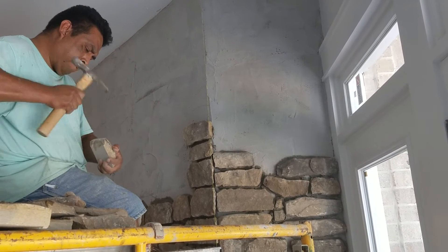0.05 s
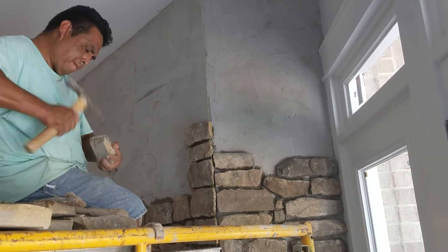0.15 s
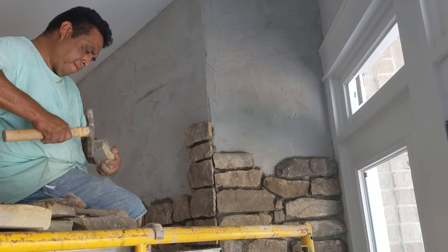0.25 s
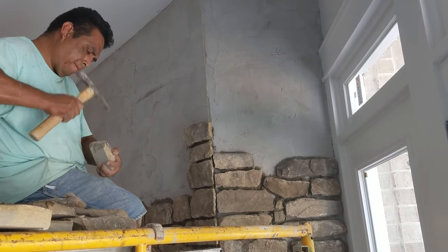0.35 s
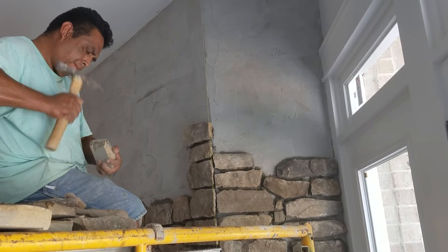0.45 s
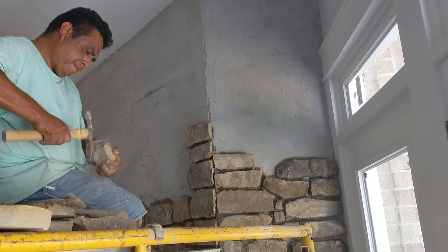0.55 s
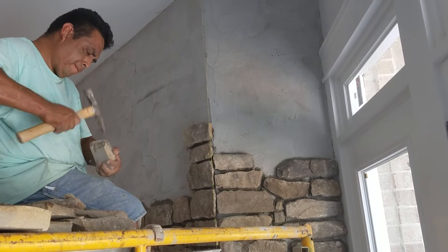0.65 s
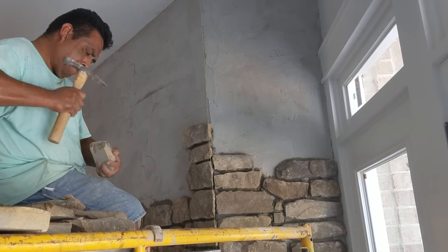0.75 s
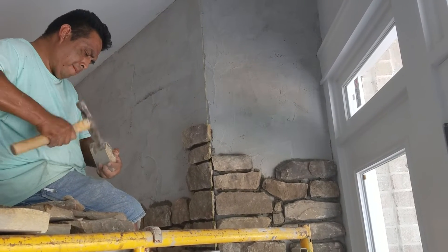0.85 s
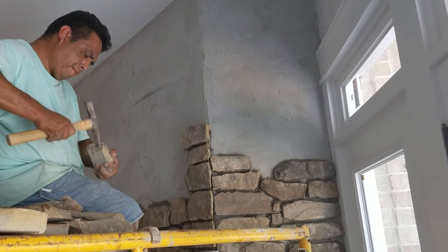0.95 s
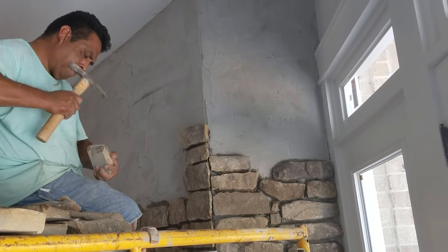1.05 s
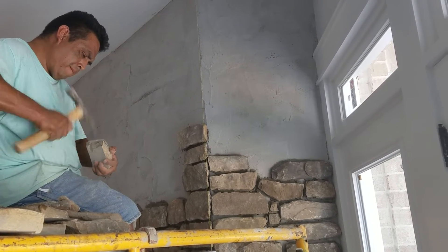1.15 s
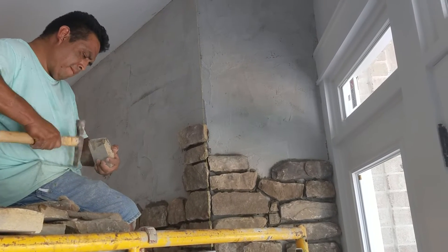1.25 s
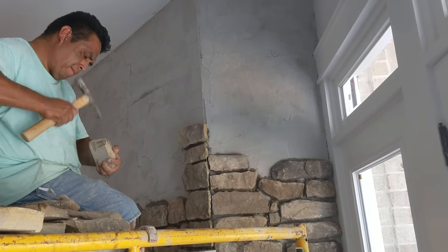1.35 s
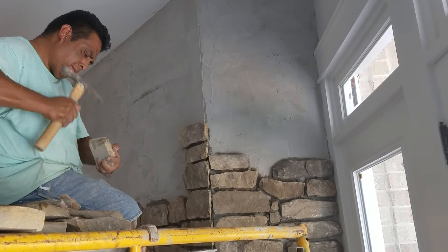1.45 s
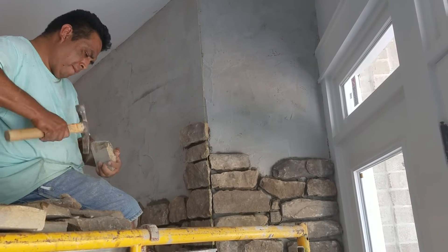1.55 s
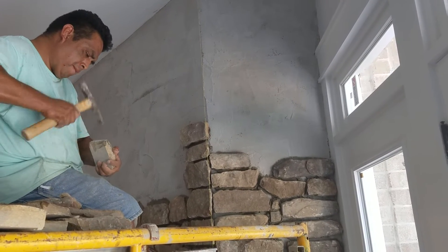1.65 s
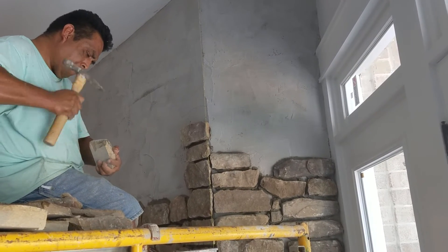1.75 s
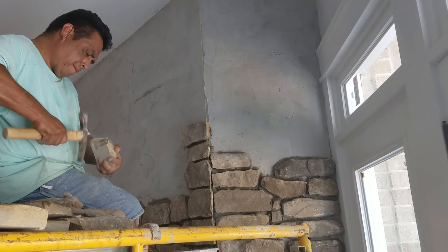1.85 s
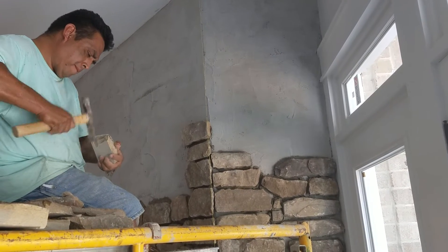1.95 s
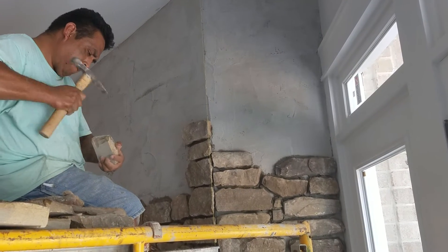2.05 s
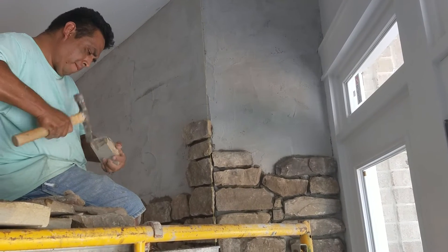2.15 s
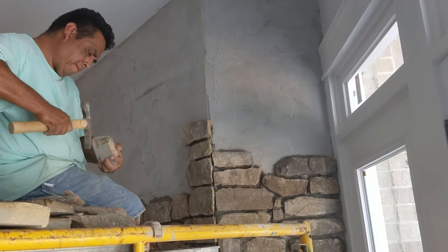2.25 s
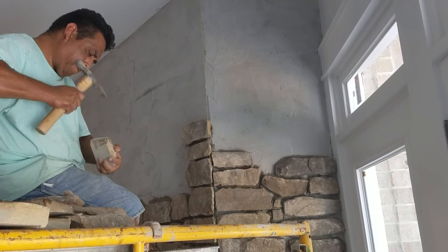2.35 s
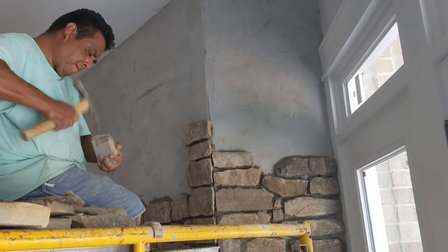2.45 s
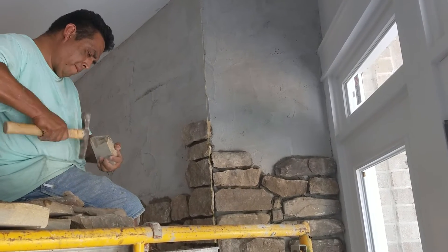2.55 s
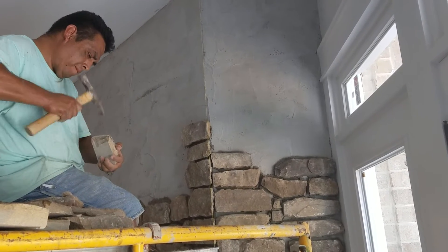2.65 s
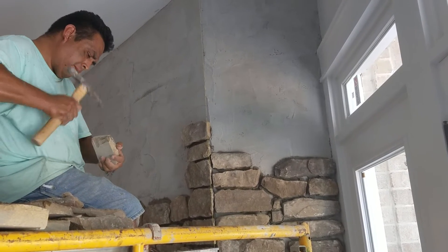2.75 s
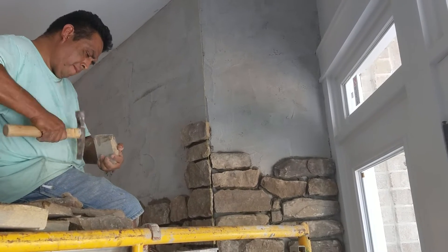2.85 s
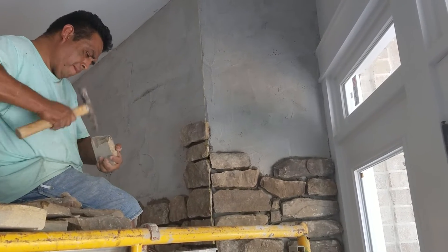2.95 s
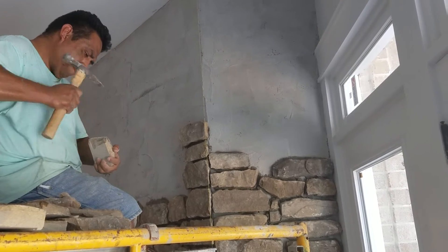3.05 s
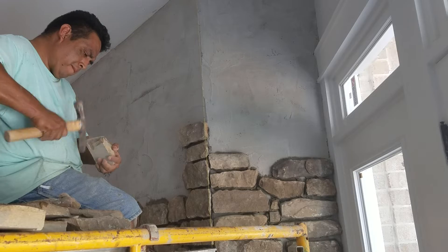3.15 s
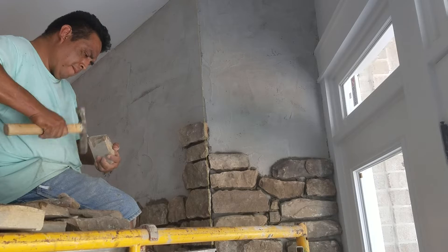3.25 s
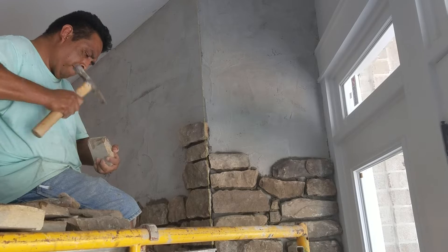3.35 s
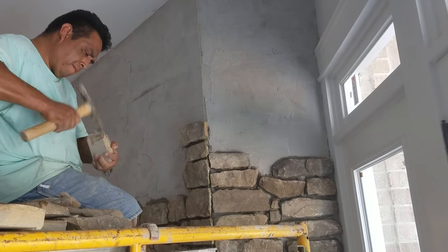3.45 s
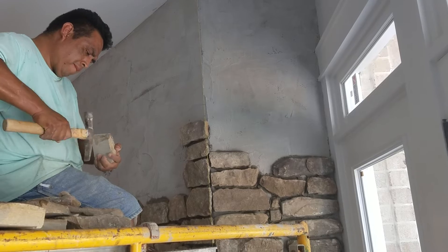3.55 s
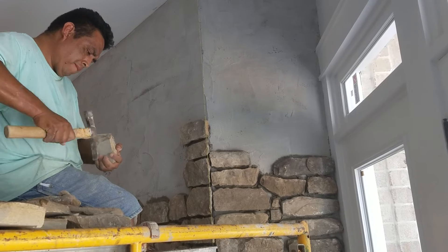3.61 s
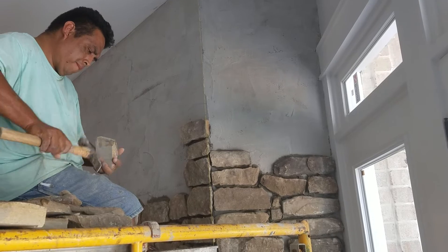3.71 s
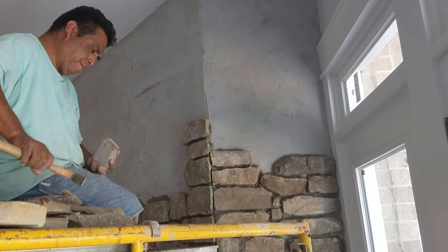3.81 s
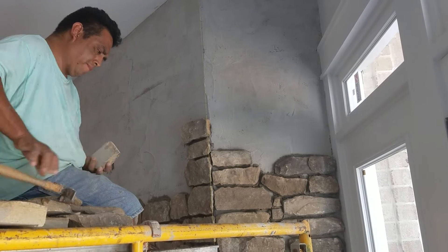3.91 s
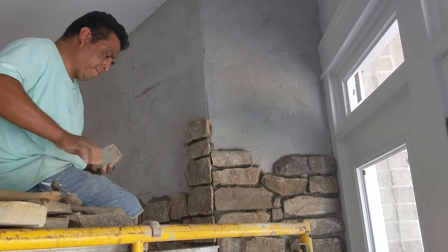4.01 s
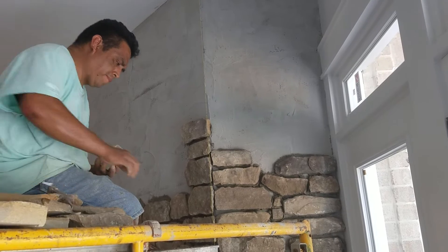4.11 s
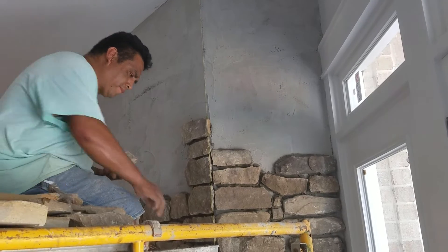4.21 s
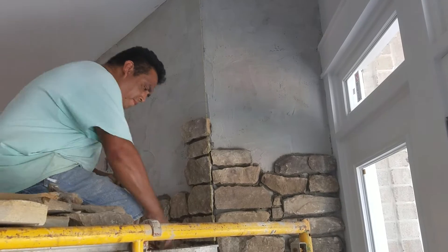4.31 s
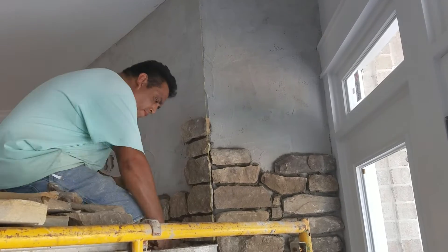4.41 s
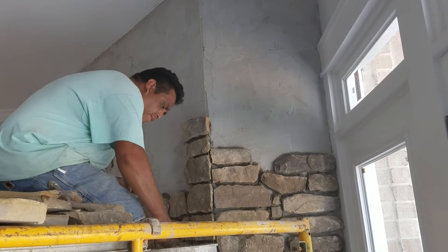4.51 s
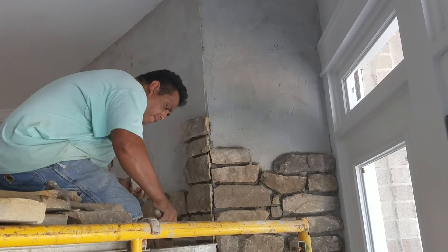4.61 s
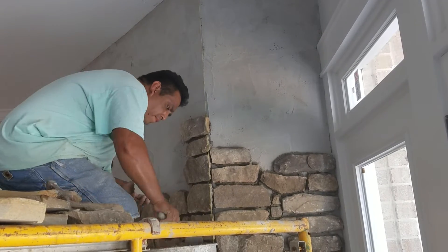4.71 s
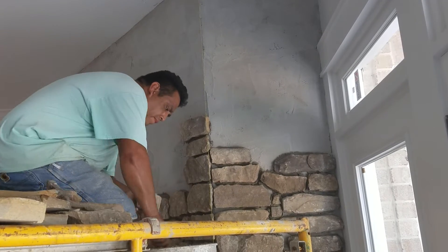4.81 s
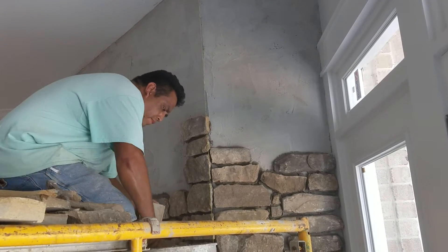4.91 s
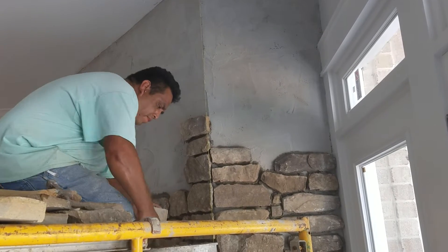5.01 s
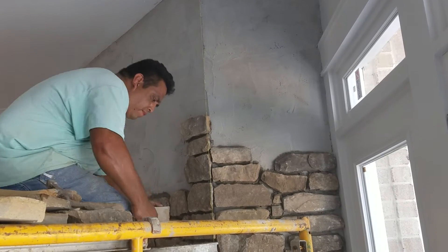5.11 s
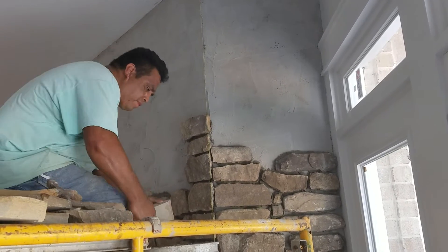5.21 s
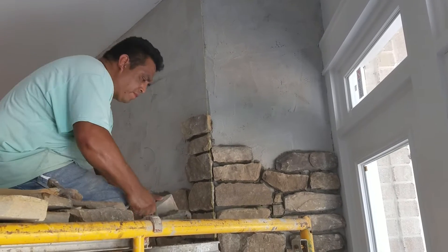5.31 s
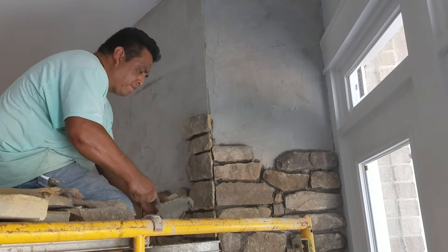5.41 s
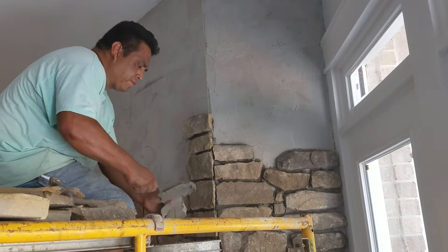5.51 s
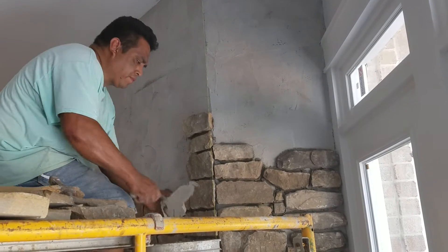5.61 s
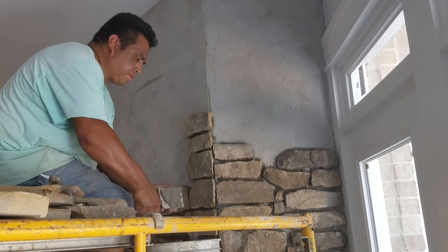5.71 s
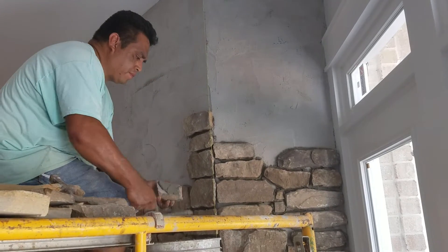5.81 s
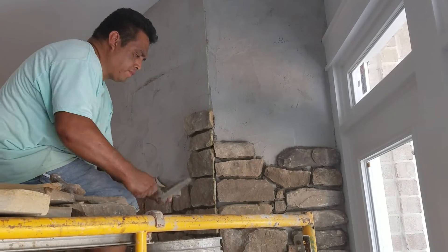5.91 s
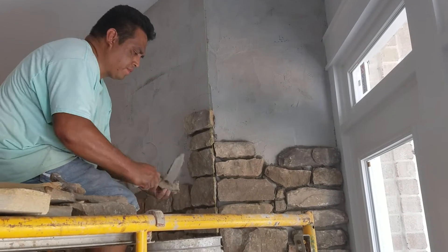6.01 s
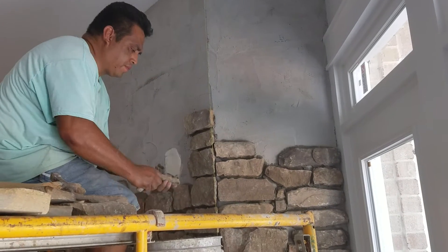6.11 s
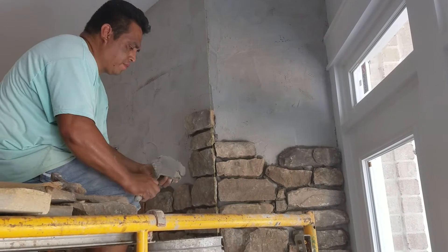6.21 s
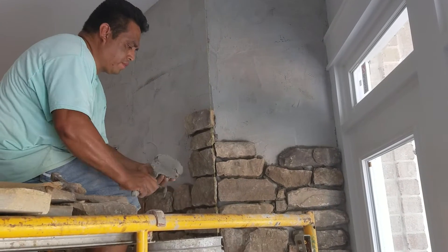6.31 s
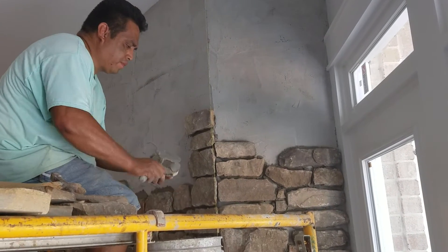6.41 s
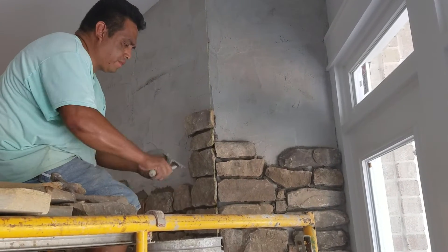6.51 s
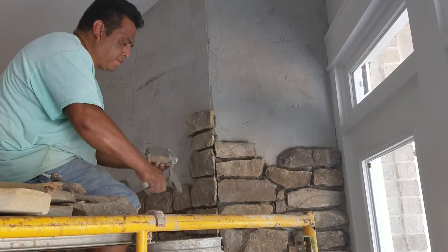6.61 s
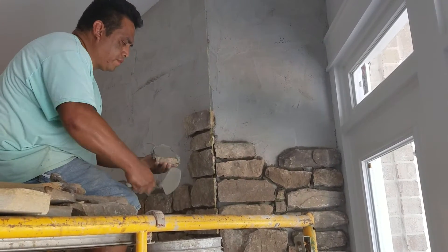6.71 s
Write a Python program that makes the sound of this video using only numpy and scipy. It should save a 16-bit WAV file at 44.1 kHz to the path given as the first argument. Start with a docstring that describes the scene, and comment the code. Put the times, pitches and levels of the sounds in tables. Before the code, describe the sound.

In an echoing porch, about a dozen evenly paced hammer blows crack against stone, the steel head ringing brightly as chips fall. The run ends in a tumble of thuds on planks. Quieter work follows: low bumps, short sandy trowel scrapes, dull knocks on a mortar tub and scattered metallic clicks. The sound is in stereo, with faint outdoor air and a distant machine humming underneath.

```python
"""In a bare plastered porch, a mason trims a hand-held stone with a steel hammer, three blows a second.
Each blow cracks the stone and rings the hammer head; broken pieces drop and thud on boards below.
He lays the hammer down, shifts on the scaffold, scrapes mortar from a tub and taps the trowel.
The walls echo all of it, over soft outdoor air and the faint hum of a distant machine."""
import sys
import numpy as np
from scipy import signal
from scipy.fft import rfft, irfft, next_fast_len
from scipy.io import wavfile
from scipy.ndimage import uniform_filter1d

SR = 44100
rng = np.random.default_rng(int(sys.argv[2]) if len(sys.argv) > 2 else 0)


def wrap_up_sound(samples):
    """Save the sound to the file named by the first command line argument, as 16-bit audio."""
    columns = np.atleast_2d(samples).T
    # keep every value between -1 and 1, then stretch to whole-number steps
    tamed = np.clip(columns, -1, 1)
    steps = np.round(tamed * 32767).astype(np.int16)
    wavfile.write(sys.argv[1], SR, steps)


N = 298116
TIME = np.arange(N) / SR  # seconds through the scene
AGE = np.arange(48000) / SR  # seconds since one short sound began

# Hammer blows; the last is just a touch as it is laid down. Each row: start in seconds, crack level
# in dB, tilt in dB per octave (higher is brighter), then a level in dB for each main head tone.
BLOWS = [(-.15, -25, 1, -28, -37, -29), (.182, -19, 0.17, -45, -38, -30.5),
         (0.5097, -19, -0.2, -35, -29, -37), (.847, -21.5, 0.92, -40, -21, -28),
         (1.1769, -23, 0.99, -29.5, -26.5, -27), (1.505, -21, 0.66, -28, -16, -32),
         (1.8232, -22, 1, -27.5, -20.5, -36), (2.148, -22.5, 0.67, -32.5, -18.5, -33),
         (2.4778, -25, 0.39, -65, -29.5, -27), (2.8012, -26, -2, -43, -22.5, -33.5),
         (3.142, -22, -1.1, -48, -24, -31.5), (3.471, -17.5, 0.72, -36, -34, -27.5),
         (4.105, -45.5, 1, -45, -39, -66)]
# The head's main tones. Each row: pitch in Hz, fade time in seconds (the time to drop by 60 dB).
HEAD_TONES = [(2520, .3), (3987, .18), (13125, .05)]
# Its weaker tones. Each row: pitch in Hz, level in dB, fade time in seconds.
WEAK_TONES = [(2062, -6, .06), (2366, -5, .08), (4650, -1, .04), (5850, 0, .04), (10400, -5, .02),
              (14420, -12, .02)]
# The colour of cracking stone. Each row: frequency in Hz, level in dB.
CRACK_COLOUR = [(20, -41), (200, -13), (350, -10), (600, 0.5), (1000, 0), (1500, 4), (2200, 4), (3100, 1.5),
                (4300, 3.5), (5100, -7.5), (6600, -7), (8000, -16.5), (14000, -11.5), (16000, -41.5)]


def hammer(weak_db=-13, sharpness=3, tick_db=-11.5, tick_from_hz=6600):
    """Steel ticks on the stone and crushes its edge; the spot that is hit decides which tones ring."""
    out = np.zeros((2, N))
    for start, db, tilt_db, *tone_levels in BLOWS:
        room = porch(direct_db=-9, early_db=-3, early_s=.011)
        crack = colour(crunch(fade_s=.00064), CRACK_COLOUR, tilt_db)
        add(out, start, db, echo(crack, room))
        tick = cut_bass(crunch(fade_s=.002), tick_from_hz)
        add(out, start, db + tick_db, echo(tick, porch(direct_db=8, early_db=8, early_s=.004)))
        # a sharper contact brings out the weaker tones
        add(out, start, db + weak_db + sharpness * tilt_db, echo(ring(WEAK_TONES, detune=.002), room))
        for (hz, fade_s), tone_db in zip(HEAD_TONES, tone_levels):
            # the head turns and travels as it bounces back, so its ring flutters
            flutter = undb(2.2 * wander(count=140, length=len(AGE)))
            head = ring([(hz, 0, fade_s)], detune=.0003) * flutter
            add(out, start, tone_db, echo(head, porch(direct_db=0, early_db=-1)))
    return out


# Stone pieces and the hammer landing on the boards. Each row: start in seconds, level in dB,
# bass cutoff in Hz, tumbling time in seconds, the piece's own ring in dB compared with the boards.
LANDINGS = [(.124, -33.5, 110, 0.0014, 3.5), (.657, -17.5, 770, 0.0034, -14),
            (2.62, -36.5, 1020, 0.00064, -15), (3.892, -17, 30.2, 0.0035, -12.5),
            (3.92, -21.5, 400, 0.0065, -12), (4.004, -25.5, 704, 0.0012, -7), (4.009, -16, 40, 0.0047, -37),
            (4.053, -19.5, 40, 0.0033, -23), (4.089, -25, 334, 0.0097, -19), (4.204, -28, 100, 0.0014, -30)]
# The colour of a thud on the boards. Each row: frequency in Hz, level in dB.
BOARD_COLOUR = [(18, -78), (40, -10.5), (110, -17), (200, -15), (290, 0), (430, -6), (520, -7.5), (740, -8),
                (950, -14), (2150, -14.5), (3100, -29), (4600, -38.5), (9000, -50), (16000, -51)]
# How the boards, a loose piece and a chip ring. Each row: pitch in Hz, level in dB, fade in seconds.
BOARD_TONES = [(167, -4.5, .15), (310, -9, 0.09), (387, 6.5, 0.075), (465, -2, 0.092), (475, -13, 0.36),
               (639, -9, 0.39), (746, -5.5, 0.12)]
PIECE_TONES = [(1903, 5.5, 0.2), (2060, 3, 0.43)]
CHIP_TONES = [(1970, -9.5, 0.016), (2560, -1, 0.0034), (3240, -5.5, 0.0026)]
# Small chips landing. Each row: start in seconds, level in dB.
CHIPS = [(0.1186, -28.5), (0.629, -25)]


def falling_pieces(board_ring_db=-8):
    """Big pieces tumble on the boards, and both ring; small chips only tick."""
    out = np.zeros((2, N))
    for start, db, cutoff_hz, tumble_s, piece_db in LANDINGS:
        thud = unit(colour(crunch(tumble_s, rise=.98), BOARD_COLOUR))
        board_ring = undb(board_ring_db) * unit(ring(BOARD_TONES, detune=.0054))
        boards = unit(cut_bass(thud + board_ring, cutoff_hz))
        piece = undb(piece_db) * unit(ring(PIECE_TONES, detune=.006))
        add(out, start, db, echo(boards + piece, porch(direct_db=-1, early_db=-2, early_s=.024)))
    for start, db in CHIPS:
        add(out, start, db, echo(ring(CHIP_TONES, detune=.02), porch(direct_db=5, early_db=-3)))
    return out


# Steel clicking on stone. Each row: start in seconds, level in dB, tilt in dB per octave,
# contact time in seconds.
TAPS = [(3.8864, -27, -2, 0.0065), (4.146, -49, 2, 0.0026), (4.583, -43.5, 2.5, 0.0019),
        (4.913, -39, 4, 0.011), (4.962, -34, 2, .006), (5.358, -37.5, 2.5, 0.0081),
        (5.5033, -24.5, 4, 0.0058), (5.513, -35, 2.5, 0.0053), (6.137, -43, 1.5, 0.014),
        (6.307, -36.5, 3, 0.0047), (6.531, -30.5, 4, 0.0026), (6.553, -31.5, 4.5, .002),
        (6.565, -41, 1.5, .003)]
# The colour of that click. Each row: frequency in Hz, level in dB.
STEEL_COLOUR = [(20, -45), (150, -49), (400, 6.5), (900, 10.5), (2000, 7.5), (3200, 2), (6000, -5.5),
                (9500, -9.5), (12000, -2.5), (14500, -4), (16000, -1)]
# The blade knocking the mortar tub. Each row: start in seconds, level in dB.
KNOCKS = [(4.962, -33.5), (5.011, -29), (5.358, -42.5), (5.505, -36)]
# The tub's tones. Each row: pitch in Hz, level in dB, fade time in seconds.
TUB_TONES = [(280, -0.5, 0.1), (370, 5.5, 0.19), (406.7, 7.5, 0.13), (455, 2, 0.12), (517, 0.5, 0.35),
             (632, -3.5, 0.077), (766, -3, 0.047), (1110, 1, 0.057)]


def trowel_taps(contact_db=-4.5, right_louder_db=.5):
    """The blade clicks on stone, and its dull knocks set the tub ringing."""
    out = np.zeros((2, N))
    pan = undb(np.array([[-right_louder_db], [right_louder_db]]) / 2)
    for start, db, tilt_db, contact_s in TAPS:
        room = pan * porch(direct_db=2, early_db=3, early_s=.005)
        click = colour(crunch(contact_s), STEEL_COLOUR, tilt_db)
        add(out, start, db, echo(click, room))
    for start, db in KNOCKS:
        room = pan * porch(direct_db=-1, early_db=4.5, early_s=.029)
        contact = unit(colour(crunch(fade_s=.0033), STEEL_COLOUR, tilt_db=-13))
        tub = unit(ring(TUB_TONES, detune=.0286))
        add(out, start, db, echo(tub + undb(contact_db) * contact, room))
    return out


# Trowel strokes through mortar. Each row: start in seconds, seconds to reach full force,
# seconds held, level in dB, treble change from dry grit in dB.
STROKES = [(4.814, 0.0092, 0.16, -44, 0), (4.936, 0.023, 0.085, -28, 0), (5.364, 0.11, 0.019, -28.5, 6.5),
           (6.133, 0.0062, 0.054, -40, -10), (6.21, 0.049, 0.025, -36, 1)]
# The colour of scraped sand. Each row: frequency in Hz, level in dB.
SAND_COLOUR = [(20, -45), (180, -4.5), (400, -1), (700, 8), (1050, 4.5), (1500, 0), (1780, 8.5), (1930, 4),
               (2090, 8), (2300, 1.5), (2520, 5), (3100, -4.5), (3960, 0), (5000, -6.5), (9500, -10),
               (12000, -3), (15500, -8)]


def trowel_scrapes(judder_db=3, grit_hz=3000):
    """Sand grains of many sizes catch under the blade as it drags."""
    sizes_db = 4.5 * rng.standard_normal(N)
    grains = rng.standard_normal(N) * undb(sizes_db + judder_db * wander(count=1000, length=N))
    sand = np.sqrt(N) * unit(colour(grains, SAND_COLOUR))
    body = signal.sosfiltfilt(signal.butter(2, grit_hz, fs=SR, output="sos"), sand)
    grit = sand - body
    drag = sum(undb(db) * stroke_force(TIME - start, rise_s, hold_s) * (body + undb(grit_db) * grit)
               for start, rise_s, hold_s, db, grit_db in STROKES)
    room = unit(porch(direct_db=2, early_db=3.5))
    return signal.fftconvolve(drag[None], room, axes=-1)[:, :N]


def stroke_force(age, rise_s, hold_s, bite_db=-14.5, ease_db_per_s=52, lift_db_per_s=418):
    """The blade bites gently, swells to full force, eases while held and fades as it lifts."""
    swell_db = bite_db * np.clip(1 - age / rise_s, 0, 1)
    ease_db = ease_db_per_s * np.clip(age - rise_s, 0, hold_s)
    lift_db = lift_db_per_s * np.maximum(age - rise_s - hold_s, 0)
    return (age >= 0) * undb(swell_db - ease_db - lift_db)


# Bumps of the scaffold. Each row: start in seconds, level in dB.
BUMPS = [(4.46, -36), (4.529, -43), (4.66, -40), (4.914, -39.5)]
# Their deep colour. Each row: frequency in Hz, level in dB.
BUMP_COLOUR = [(25, -12), (60, -7), (130, 0), (240, -6.5), (450, -11), (1000, -16.5), (4000, -29.5),
               (15000, -46.5)]


def scaffold():
    """The planks bump as the mason leans forward."""
    out = np.zeros((2, N))
    for start, db in BUMPS:
        bump = colour(crunch(fade_s=.029), BUMP_COLOUR)
        add(out, start, db, echo(bump, porch(direct_db=-4, early_db=-10)))
    return out


# How long the walls echo. Each row: frequency in Hz, fade time in seconds.
WALL_ECHO = [(100, 0.94), (400, 1), (1500, 1), (4000, 0.75), (8000, 0.81), (14000, 0.42)]


def porch(direct_db, early_db, early_s=.012, build_s=.0047, alike_hz=620):
    """One click in the porch: the direct sound, early bounces off close walls, then a tail at 0 dB."""
    hz = np.fft.rfftfreq(512, 1 / SR)
    seconds = np.arange(190) * 256 / SR
    noise = rng.standard_normal((2, len(hz), len(seconds), 2)) @ np.array([1, 1j])
    fading = undb(-60 * seconds / read(WALL_ECHO, hz)[:, None])
    tail = signal.istft(noise * fading)[1][:, :len(AGE)] * (1 - np.exp(-AGE / build_s))
    early = rng.standard_normal((2, len(AGE)))
    early *= np.exp(.6 * rng.standard_normal(len(AGE)) - AGE / early_s)
    mid, side = rfft(unit(tail) + undb(early_db) * unit(early))
    # long waves reach both microphones alike: more shared sound (mid), less left-right contrast (side)
    alike = 1 / (1.02 + (np.fft.rfftfreq(len(AGE), 1 / SR) / alike_hz) ** 4)
    mid, side = mid * np.sqrt((1 + alike) / 2), side * np.sqrt((1 - alike) / 2)
    room = irfft(np.array([mid + side, mid - side]))
    room[[0, 1], [0, 6]] += undb(direct_db)  # reaches the right side 6 samples after the left
    return room


# The colour of the air, then the tones of the hum. Each row: frequency in Hz, level in dB.
AIR_COLOUR = [(12, -48), (24, -23.5), (40, -13), (55, -23), (90, -9.5), (200, -12), (300, -11.5),
              (800, -23), (1700, -22), (4000, -30), (9500, -39.5), (15500, -34)]
HUM_TONES = [(56, -63.5), (85, -63.5), (138, -66.5), (170, -83), (225, -64)]


def air_and_hum(air_db=-54, wide_above_hz=700, waver=.44):
    """Soft outdoor air and the wavering hum of a distant machine."""
    mid, side = colour(rng.standard_normal((2, N)), AIR_COLOUR)
    side = cut_bass(side, wide_above_hz, order=1)
    out = undb(air_db) * np.sqrt(N) * unit(np.array([mid + side, mid - side]))
    for hz, db in HUM_TONES:
        swell, drift = wander(count=50, length=N), wander(count=50, length=N)
        out += undb(db) * np.sqrt(2) * (1 + waver * swell) * np.sin(2 * np.pi * hz * TIME + drift)
    return out


def crunch(fade_s, rise=0):
    """A spray of tiny contacts; rise 0 starts at full force, rise 1 builds up first."""
    age = AGE / fade_s
    noise = rng.standard_normal(len(AGE))
    grains = unit(noise * age ** rise * np.exp(.72 * rng.standard_normal(len(AGE)) - age))
    # even out the colour, so that no range of pitches stands out
    power = uniform_filter1d(np.abs(rfft(grains)) ** 2, size=120) + .02
    power_hz = np.fft.rfftfreq(len(AGE), 1 / SR)
    return equalize(grains, lambda hz: np.interp(hz, power_hz, power) ** -.5)


def ring(tones, detune):
    """A struck object's fading tones, each slightly off pitch at random and swelling within a cycle."""
    out = 0
    for hz, db, fade_s in tones:
        cycles = hz * (1 + detune * rng.standard_normal()) * AGE
        loudness = (1 - np.exp(-2 * cycles)) ** 2 * undb(-60 * AGE / fade_s)
        out = out + undb(db) * unit(np.sin(2 * np.pi * cycles) * loudness)
    return out


def echo(x, room):
    """Pass a short sound through the room."""
    return signal.fftconvolve(np.atleast_2d(x), room, axes=-1)[:, :len(AGE)]


def add(out, start_s, db, sound):
    """Mix in a sound; db is its level with the energy spread over a tenth of a second."""
    start = int(round(start_s * SR))
    a, b = max(start, 0), min(start + sound.shape[-1], N)
    out[:, a:b] += undb(db) * np.sqrt(SR / 10) * unit(sound)[:, a - start:b - start]


def colour(x, points, tilt_db=0):
    """Set a sound's balance of bass and treble from a table, tilted around roughly 1 kHz."""
    return equalize(x, lambda hz: undb(read(points, hz) + tilt_db * np.log2((hz + 100) / 1000)))


def equalize(x, gain_of_hz):
    """Turn each frequency up or down, with no ringing before the sound starts."""
    n = 2 * next_fast_len(x.shape[-1] // 2 + 1, True)
    cepstrum = irfft(np.log(gain_of_hz(np.fft.rfftfreq(n, 1 / SR))))
    cepstrum[1:n // 2] *= 2
    return irfft(rfft(x, n) * np.exp(rfft(cepstrum[:n // 2], n)))[..., :x.shape[-1]]


def cut_bass(x, hz, order=2):
    """Turn down everything below hz."""
    return signal.sosfilt(signal.butter(order, hz, "high", fs=SR, output="sos"), x)


def wander(count, length):
    """A random curve through count points, straying about 1 from zero."""
    return np.interp(np.linspace(0, count - 1, length), np.arange(count), rng.standard_normal(count))


def read(points, hz):
    """Look up a frequency in a table, sliding between rows on a scale of octaves."""
    row_hz, value = np.transpose(points)
    return np.interp(np.log(hz + 1), np.log(row_hz), value)


def unit(x):
    """Scale to an average energy of one per channel."""
    return x / np.sqrt(np.mean(np.sum(x ** 2, axis=-1)))


def undb(db):
    """Turn decibels into a multiplier."""
    return 10 ** (np.asarray(db) / 20)


def scene():
    """All the work in the porch, over the background."""
    return hammer() + falling_pieces() + scaffold() + trowel_taps() + trowel_scrapes() + air_and_hum()


# The microphones' balance. Each row: frequency in Hz, left level minus right level in dB.
MIC_BALANCE = [(200, 0.5), (450, 0.5), (1000, -1.5), (2000, -2.5), (4000, 0.9), (8000, 2.5), (13000, -1)]


def record(dry, top_hz=15900):
    """Each microphone colours the sound a little; peaks clip at full scale and the top treble is cut."""
    left = equalize(dry[0], lambda hz: undb(read(MIC_BALANCE, hz) / 2))
    right = equalize(dry[1], lambda hz: undb(-read(MIC_BALANCE, hz) / 2))
    treble_cut = signal.ellip(10, .2, 80, top_hz, fs=SR, output="sos")
    return signal.sosfilt(treble_cut, np.clip([left, right], -1, 1))


dry = scene()
out = record(dry)
wrap_up_sound(out)
```